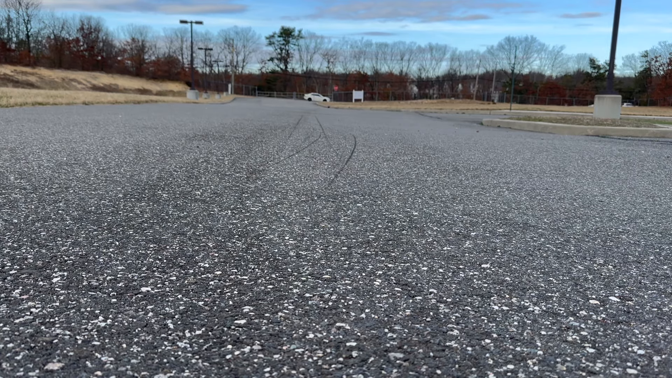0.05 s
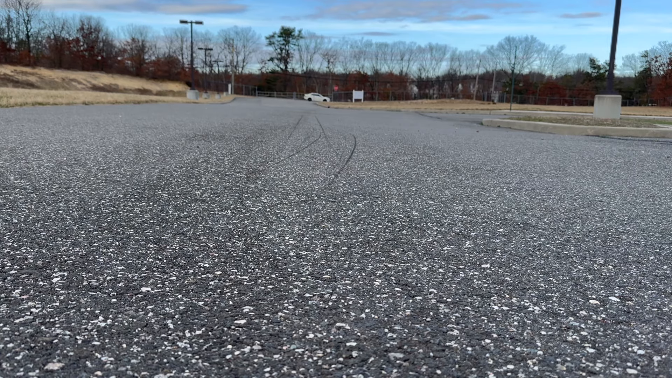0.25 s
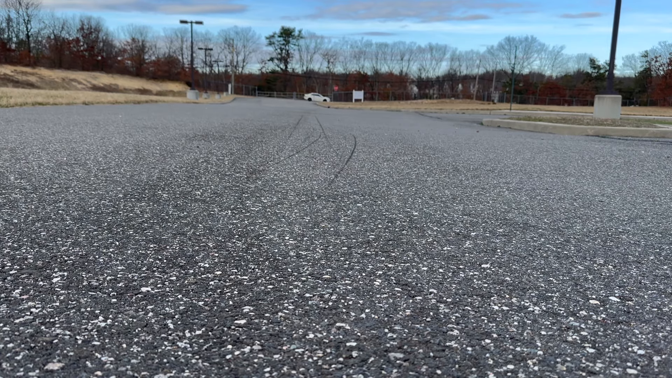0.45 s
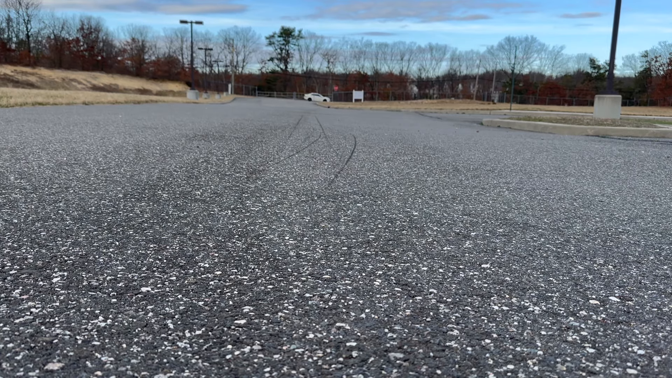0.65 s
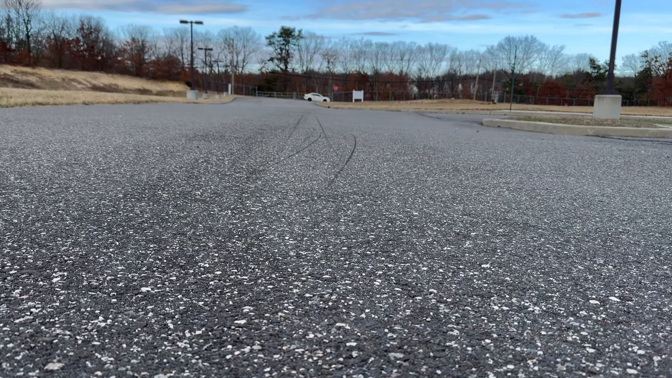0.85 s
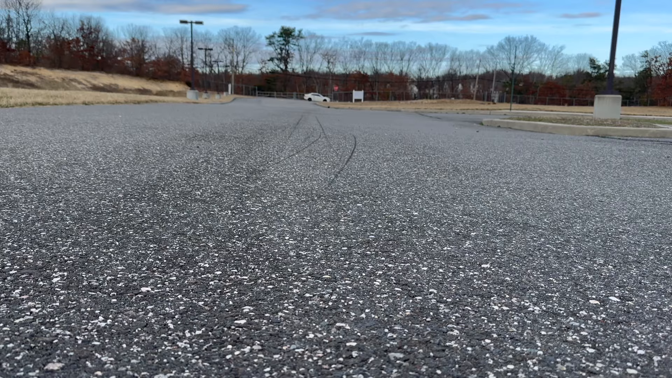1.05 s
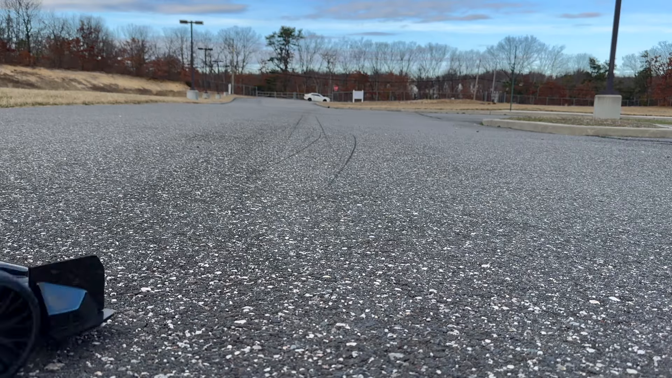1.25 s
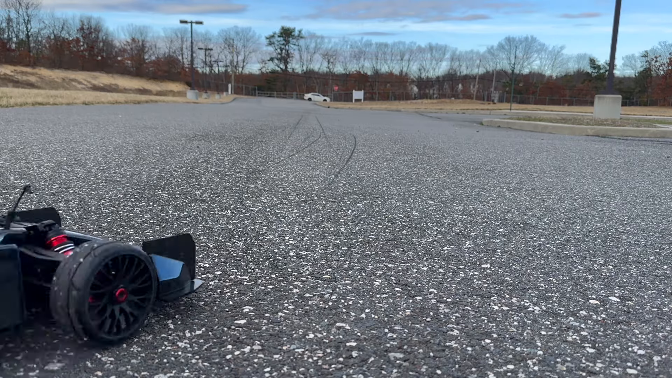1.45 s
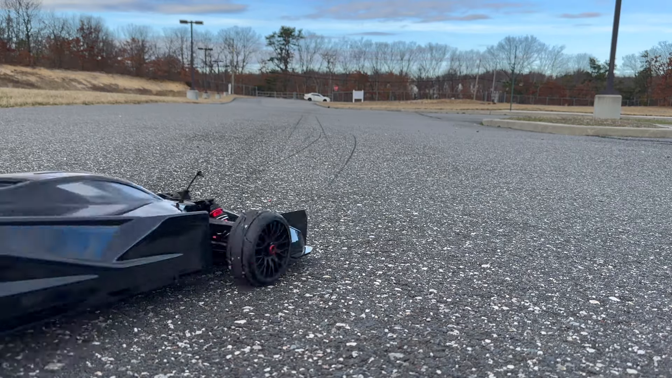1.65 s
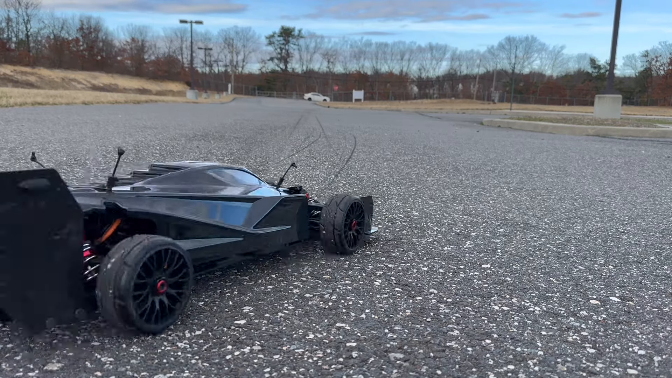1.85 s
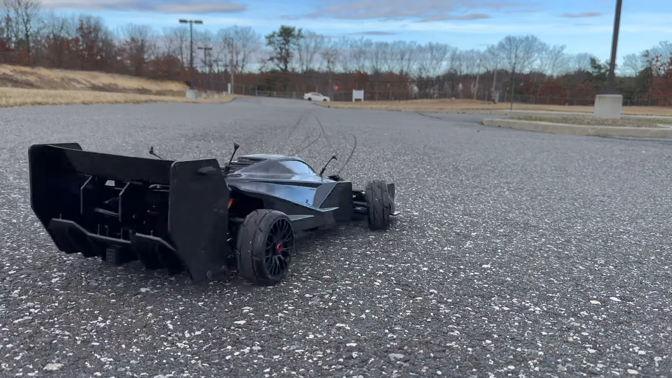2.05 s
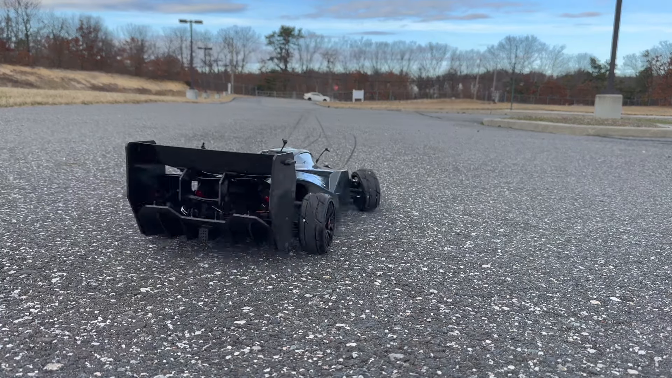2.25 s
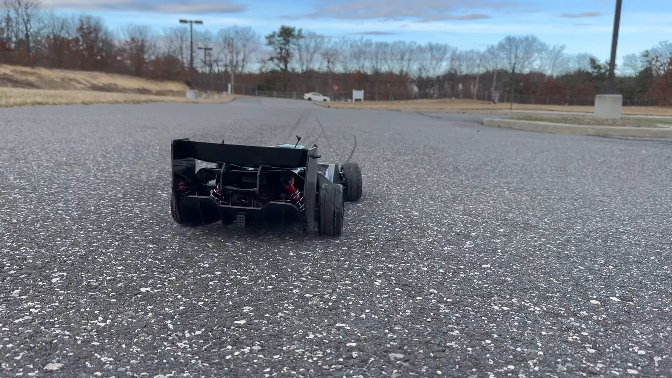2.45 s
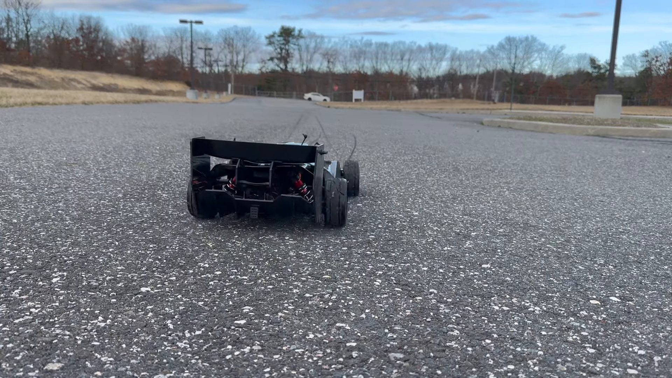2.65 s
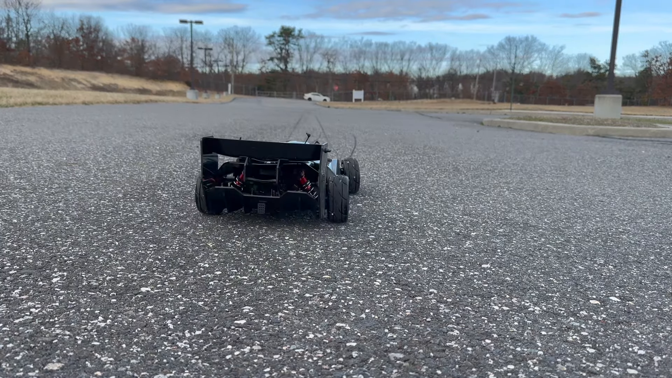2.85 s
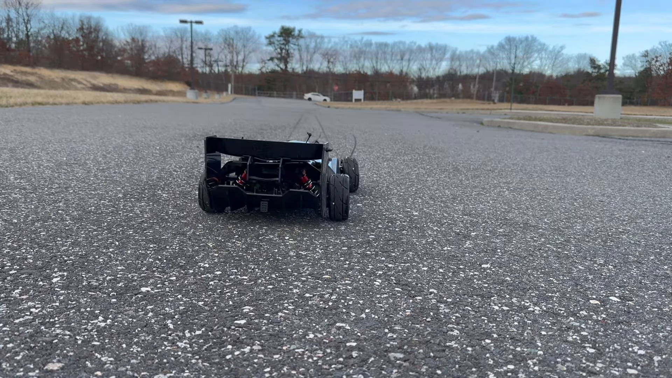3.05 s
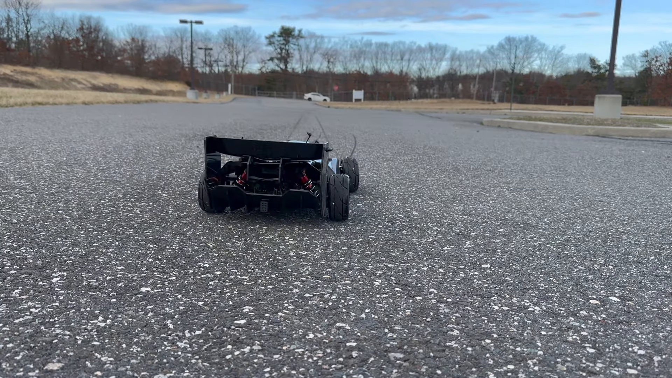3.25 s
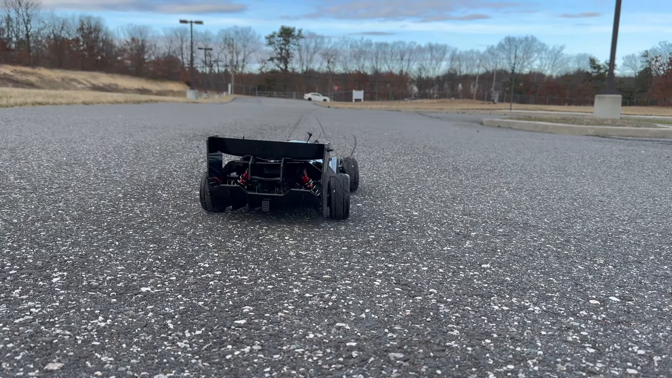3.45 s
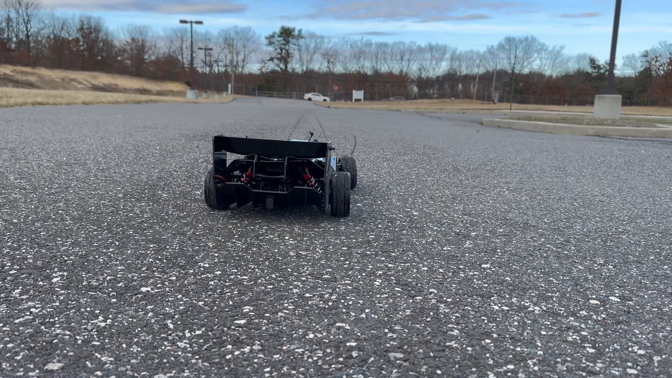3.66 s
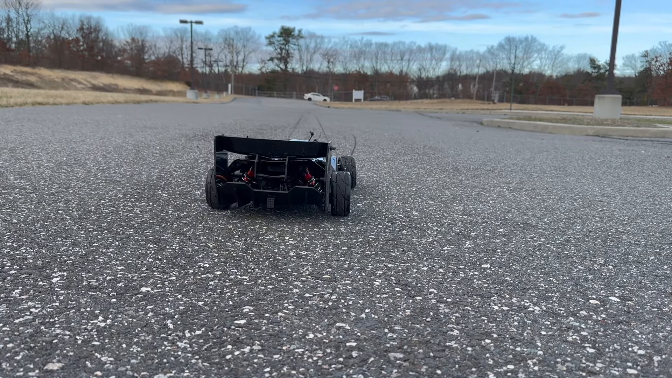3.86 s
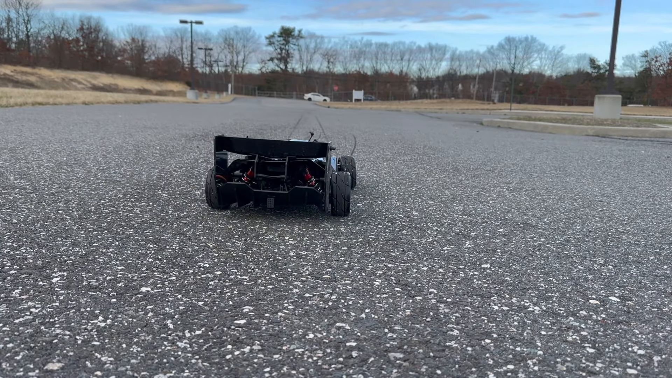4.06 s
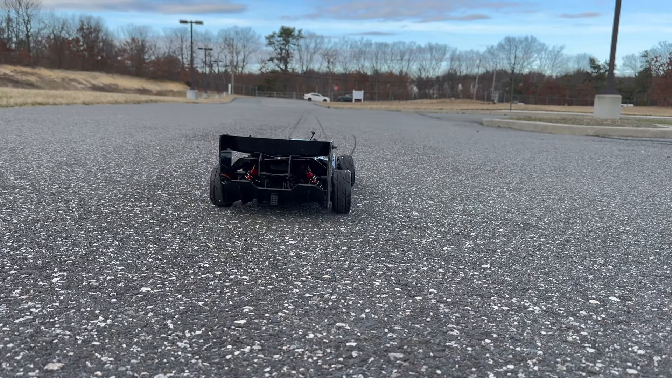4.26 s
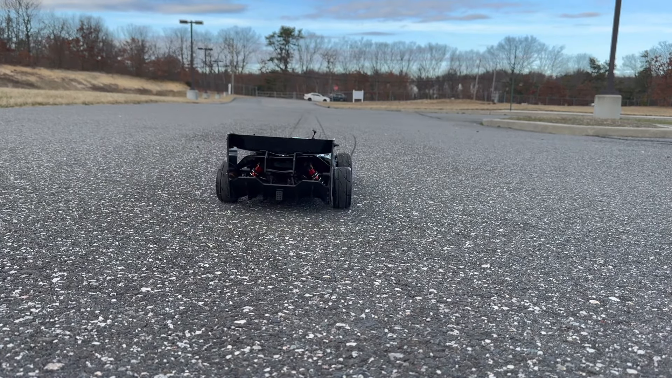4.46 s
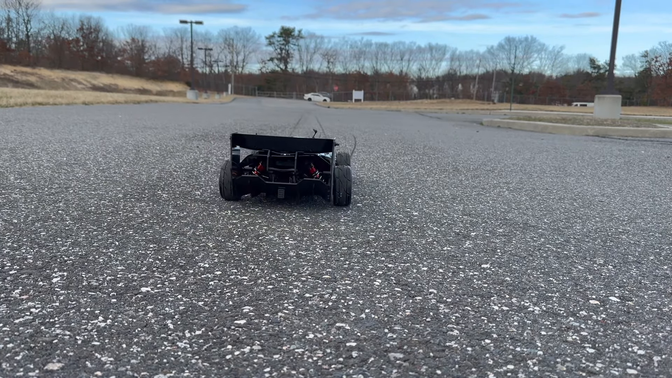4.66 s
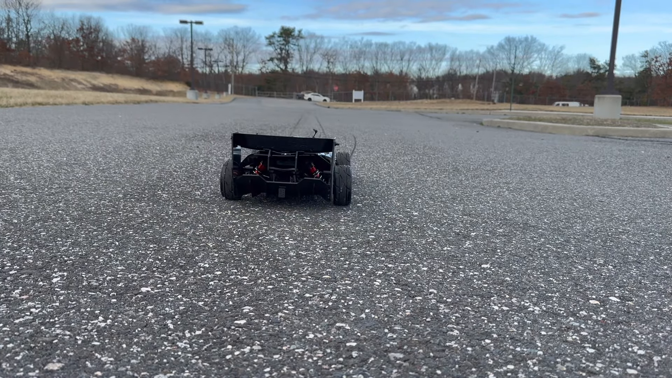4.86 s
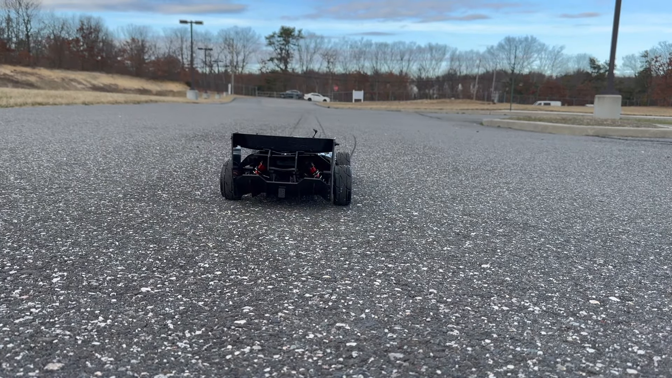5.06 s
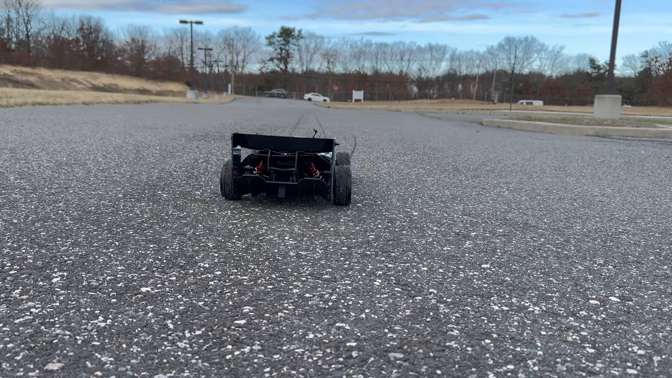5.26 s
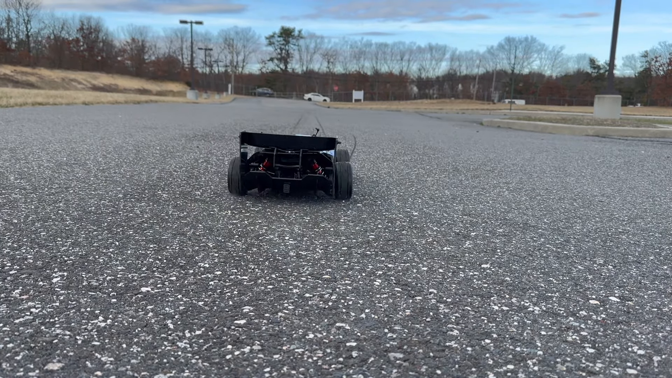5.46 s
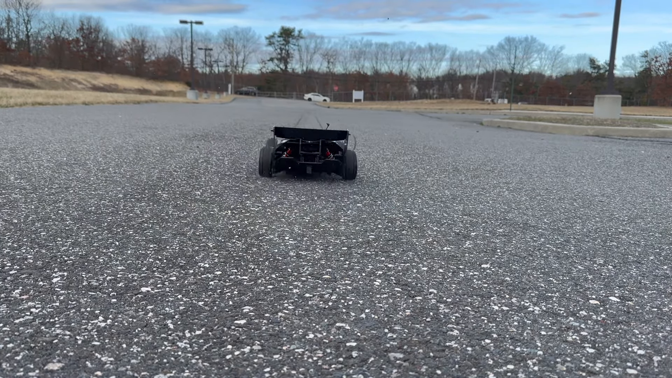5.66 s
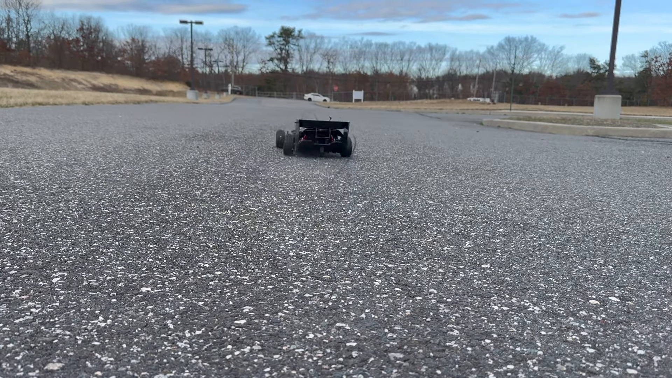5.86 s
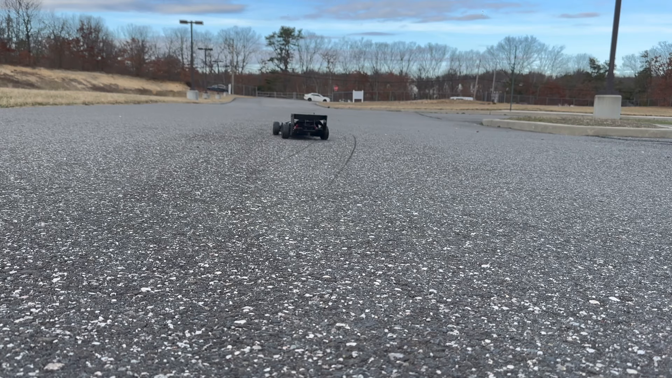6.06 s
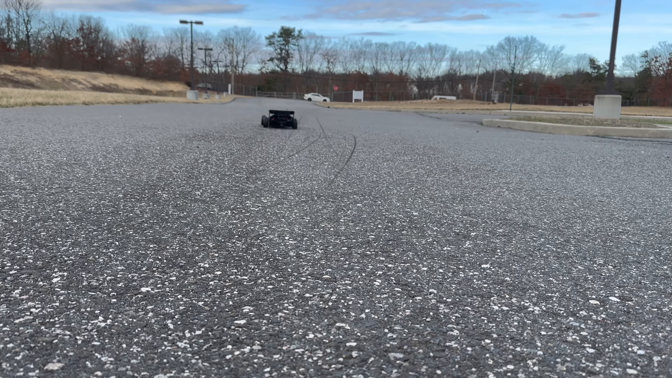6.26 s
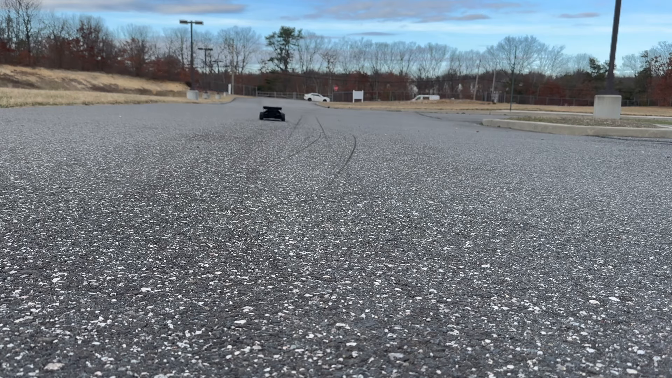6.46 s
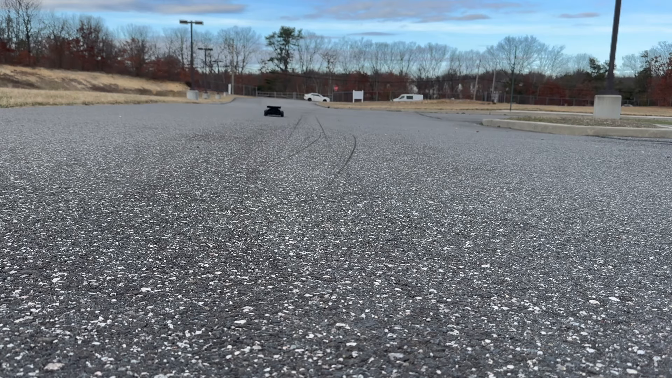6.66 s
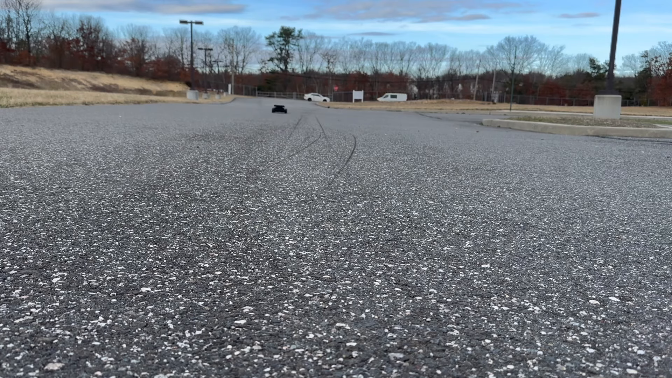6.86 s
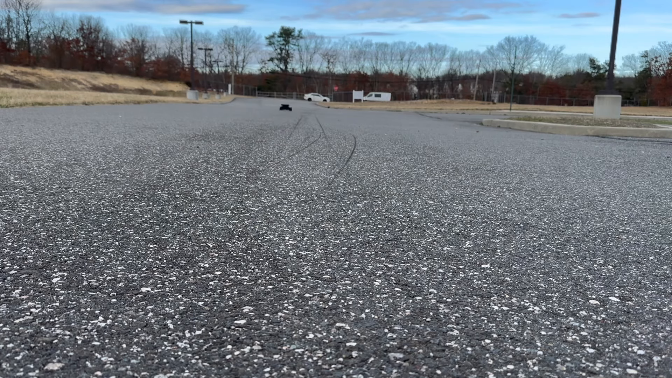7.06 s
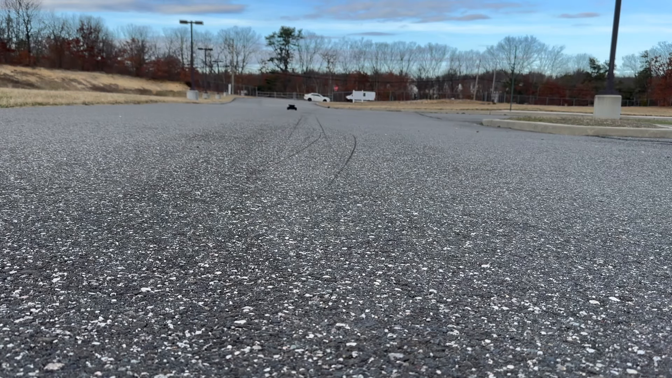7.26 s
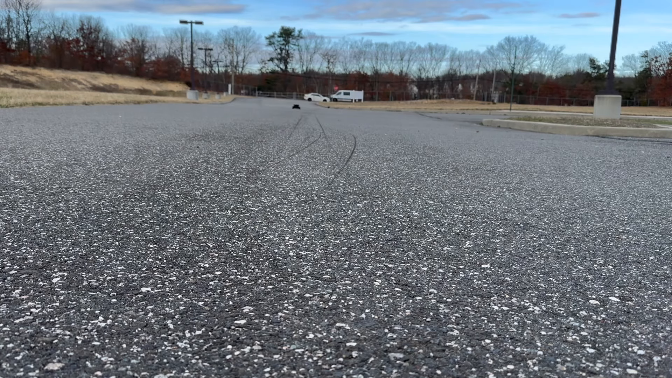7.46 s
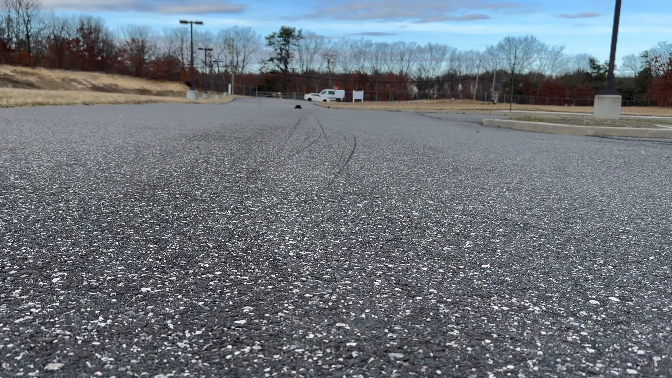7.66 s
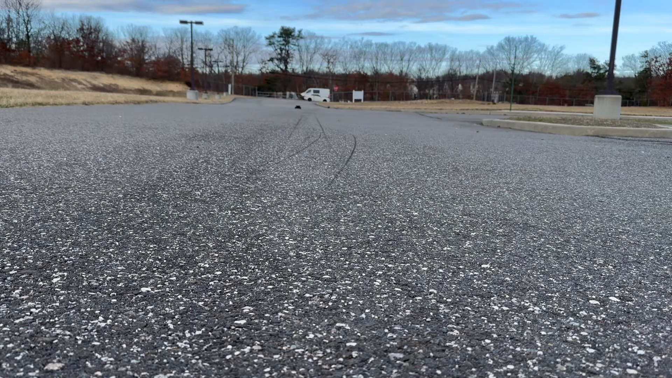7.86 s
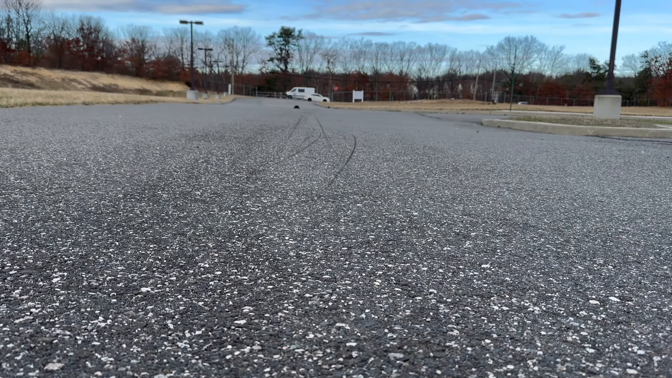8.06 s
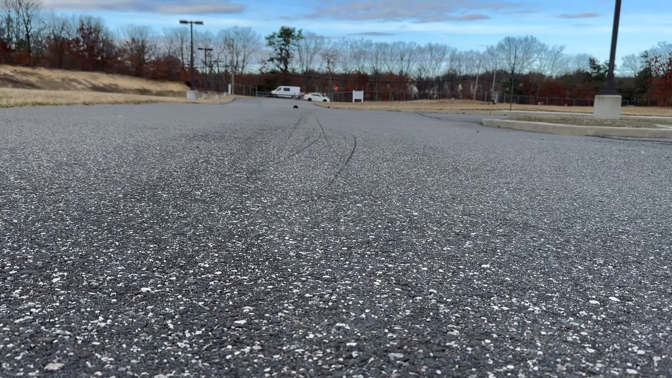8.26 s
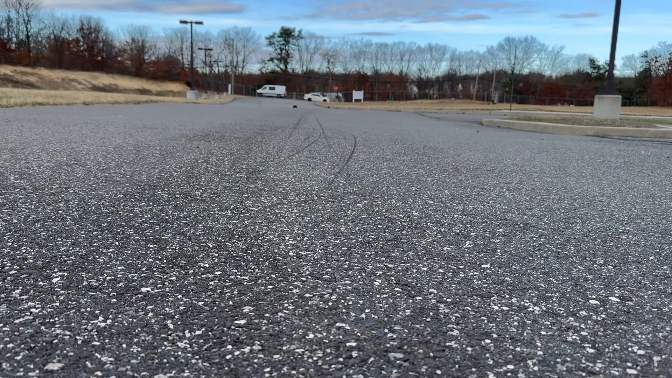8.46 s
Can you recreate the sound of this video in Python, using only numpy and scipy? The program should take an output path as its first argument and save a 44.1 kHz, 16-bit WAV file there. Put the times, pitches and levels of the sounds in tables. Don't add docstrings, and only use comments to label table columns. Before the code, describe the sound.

Wind buffets a close microphone as a toy-sized electric car clatters past, stops, chatters in short bursts, and whines away into the distance.

```python
import sys
import numpy as np
from scipy import signal
from scipy.fft import rfft, irfft, next_fast_len
from scipy.io import wavfile
from scipy.ndimage import uniform_filter1d

SR = 44100
rng = np.random.default_rng(int(sys.argv[2]) if len(sys.argv) > 2 else 0)


def field_ratio(decibels):
    return 10 ** (np.asarray(decibels, dtype=float) / 20)


def wav_record(signal):
    frames = np.transpose(np.atleast_2d(signal))
    bounded = np.clip(frames, -1, 1)
    quanta = np.round(bounded * 32767).astype(np.int16)
    wavfile.write(sys.argv[1], SR, quanta)


N = 375206
T = np.arange(N) / SR

# (time [s], rattle level [dB], left over right in the bass [dB])
ROLL = [
    (0.0, -41.5, -15.5),
    (0.64, -31.5, 2),
    (1.31, -34.5, 15.5),
    (1.5, -32.5, 4),
    (1.67, -34, 11),
    (2.38, -36, 0),
    (2.7, -43, 4.5),
    (3.04, -62, 0),
]
# (time [s], chatter level [dB])
RUN = [
    (5.46, -23.5),
    (5.74, -22),
    (6.03, -30),
    (6.1, -34),
    (6.57, -35),
    (6.95, -36.5),
    (7.1, -39.5),
    (7.15, -45.5),
    (7.6, -49),
    (8.51, -50),
]
# (resonance [Hz], width [Hz], level [dB])
LOADED_BODY = [(939, 83, 7.5), (1330, 74, 4.5), (1768, 55, 7), (2170, 120, 0), (3380, 370, -1),
               (4100, 310, 0), (7300, 1300, -19), (8240, 210, -21.5), (9170, 90, -36.5), (9630, 120, -21)]
# (frequency [Hz], level [dB])
LOADED_FILL = [(300, -52), (800, -3), (2500, -2), (5000, -15.5), (7000, -12.5), (10000, -9), (13000, -19),
               (16000, -16.5)]


def evened(x):
    return x / np.sqrt(np.mean(x ** 2) + 1e-20)


def read(points, hz):
    f, value = np.transpose(points)
    return np.interp(np.log(hz + 1), np.log(f + 1), value)


def curves(rows):
    s, *columns = np.transpose(rows)
    gate = uniform_filter1d(1. * (T > s[0]) * (T < s[-1]), size=260)
    return [gate] + [np.interp(T, s, c) for c in columns]


def band(x, lo_hz, hi_hz):
    return signal.sosfilt(signal.butter(3, [lo_hz, hi_hz], "bandpass", fs=SR, output="sos"), x)


def lowpassed(x, order, hz):
    return signal.sosfiltfilt(signal.butter(order, hz, fs=SR, output="sos"), x)


def wander(hz):
    sos = signal.butter(4, hz, fs=SR / 32, output="sos")
    coarse = signal.sosfilt(sos, rng.standard_normal(N // 32 + 2))
    return np.interp(np.arange(N) / 32, np.arange(len(coarse)), evened(coarse))


def field(colour, same):
    size = next_fast_len(N)
    hz = np.fft.rfftfreq(size, 1 / SR)
    left, other = rfft(rng.standard_normal((2, size)))
    same = np.clip(read(same, hz), -1, 1)
    pair = np.array([left, same * left + np.sqrt(1 - same ** 2) * other])
    return evened(irfft(pair * field_ratio(read(colour, hz)), size)[:, :N])


def traffic():
    # (frequency [Hz], level [dB])
    spectrum = [(180, -27.5), (300, -21.5), (600, -9), (647, -9), (1100, -8.5), (1240, -11), (1530, -10.5),
                (1650, -15.5), (4660, -37.5), (8800, -50), (10200, -65.5), (14300, -100.5), (22000, -120)]
    # (frequency [Hz], left-right likeness [-1 to 1])
    likeness = [(60, 0.88), (130, 0.42), (290, 0.97), (640, -0.038), (1410, -0.35), (3100, 0.62),
                (6820, -0.44), (15000, -0.5)]
    # (time [s], level [dB])
    swell = [
        (0, 5.5),
        (3, 3),
        (5.2, 2.5),
        (7, -3),
        (8.5, 2.5),
    ]
    swell_db = np.interp(T, *np.transpose(swell)) + 1.45 * wander(8.3)
    return field_ratio(swell_db - 48) * field(spectrum, likeness)


def wind():
    # (time [s], level [dB])
    strength = [(0.0, -43), (0.57, -31), (0.75, -36), (0.92, -23), (1.04, -39), (1.3, -30), (1.55, -42),
                (1.85, -31), (2.2, -39.5), (2.9, -33), (3.3, -33), (3.74, -46), (4.07, -43.5),
                (4.69, -36.5), (5.25, -46), (6.2, -45), (6.6, -55.5), (7.0, -48), (7.9, -47.5), (8.08, -46),
                (8.51, -46.5)]
    # (time [s], peak level [dB], frequency [Hz])
    gusts = [(0.354, -18, 145), (0.896, -23.5, 99.3), (1.204, -21.5, 193), (1.323, -19.5, 102),
             (1.464, -11.5, 507), (1.746, -18.5, 216), (1.945, -9.5, 282), (2.517, -43, 174),
             (2.574, -14, 147), (2.686, -9, 272), (2.959, -17.5, 190), (3.219, -14, 141),
             (4.04, -14.5, 212), (4.102, -16, 155.4), (4.489, -24, 119), (4.649, -16.5, 195),
             (3.27, -24, 303), (3.318, -25, 397), (6.207, -25, 200), (8.069, -24, 90), (0.208, -19, 93.5),
             (0.454, -15.5, 125), (1.096, -21, 85.6), (1.851, -19, 68.3), (2.245, -30, 84),
             (2.368, -18.5, 200), (3.128, -35.5, 108.4), (3.239, -30, 444), (3.295, -24, 347),
             (3.53, -22.5, 189), (3.831, -26.5, 87), (3.994, -18.5, 89), (4.921, -24, 165),
             (6.785, -37, 123.5), (7.788, -32.5, 81), (7.904, -41, 129)]
    # (frequency [Hz], level [dB])
    rumble = [(20, -56), (40, 4.5), (75, 12), (130, 8.5), (200, 0), (300, -68)]
    # (frequency [Hz], level [dB])
    flutter = [(120, -23), (200, 1), (300, -4), (450, -10), (700, -57)]
    _, wind_db = curves(strength)
    same = [(1, 0.67), (2, 0.67)]
    out = field(rumble, same) * field_ratio(wind_db + 3.33 * wander(30) + 0.5)
    out += field(flutter, same) * field_ratio(wind_db - 8 + 5.3 * wander(52))
    t = np.arange(-700, 700) / SR
    for (s, peak_db, hz), phase in zip(gusts, rng.uniform(0, 2 * np.pi, len(gusts))):
        swing = np.cos(2 * np.pi * hz * t + phase)
        flip = field_ratio(peak_db - 2.5) * swing * np.exp(-(t * hz / 0.45) ** 2)
        out[:, round(s * SR) - 400:][:, :1400] += flip
    return out


def grit():
    # (time [s], peak level [dB])
    stones = [
        (1.869, -17),
        (5.913, -20),
        (6.038, -7),
    ]
    out, t = np.zeros(N), np.arange(200) / SR
    for (s, peak_db), noise in zip(stones, rng.standard_normal((len(stones), 200))):
        out[round(s * SR):][:200] += field_ratio(peak_db + 3.0) * noise * np.exp(-((t - .0008) / 0.00019) ** 2)
    return band(out, 4000, 10500)


def body(modes, fill):
    hz = abs(np.fft.fftfreq(8192, 1 / SR))
    power = field_ratio(read(fill, hz)) ** 2
    power += sum(field_ratio(db) ** 2 / (1 + (2 * (hz - f) / w) ** 2) ** 1.027 for f, w, db in modes)
    log_gain = np.log(power) / 2
    decay = np.fft.ifft(np.exp(log_gain - 1j * signal.hilbert(log_gain).imag)).real[:4096]
    parts = []
    for kind in ("low", "high"):
        half = signal.butter(2, 3500, kind, fs=SR, output="sos")
        part = signal.sosfilt(np.vstack([half, half]), decay)
        parts.append(part / np.linalg.norm(part))
    return parts


def ring(low_drive, high_drive, response):
    low = signal.oaconvolve(low_drive, response[0])[:N]
    return low + signal.oaconvolve(high_drive, response[1])[:N]


def knocks(per_s, spread_db, lump_hz, lump_db):
    size = field_ratio(spread_db * np.minimum(rng.exponential(1, N), 4)) * rng.choice([-1, 1], N)
    return evened(size * (rng.random(N) < per_s / SR) * field_ratio(lump_db * wander(lump_hz)))


def clack_drives(clacks, bright_db, decay_s, dull):
    low, high = np.zeros((2, N))
    t = np.arange(600) / SR
    bounces = rng.standard_normal((len(clacks), 600)) * np.exp(-t / .0045) * (1 - np.exp(-t / .0003))
    bounces /= np.linalg.norm(bounces, axis=1)[:, None]
    for (s, peak_db), bounce in zip(clacks, bounces):
        start = round(s * SR)
        treble = signal.lfilter([1], [1, -min(dull, .9)], bounce * np.exp(-t / decay_s))
        low[start:][:600] += field_ratio(peak_db + 15.5) * bounce
        high[start:][:600] += field_ratio(peak_db + bright_db) * treble
    return np.array([low, high])


def coasting():
    # (resonance [Hz], width [Hz], level [dB])
    side_body = [(878, 110, 2), (1530, 90, 10), (2320, 450, -7), (3830, 430, -16), (5870, 240, -14.5),
                 (8400, 190, -23.5), (9620, 150, -14), (9900, 75, -26.5)]
    quarter_body = [(894, 170, -1.5), (1350, 79, -1.5), (1758, 120, 2.5), (3210, 560, -6.5),
                    (3890, 320, -2.5), (4400, 180, -2), (5560, 160, -1), (9550, 36, -0.5), (9800, 74, 5)]
    rear_body = [(1023, 66, 10), (1350, 140, 5.5), (1735, 102, 14), (2090, 110, -27), (3485, 320, -3),
                 (4170, 310, -3.5), (5630, 210, -19), (8230, 180, -44), (9400, 22, 3), (10480, 46, -4)]
    # (frequency [Hz], level [dB])
    coast_fill = [(400, -15), (900, -4.5), (2500, -17.5), (4500, -24.5), (7000, -21.5), (10000, -56),
                  (13000, -39), (16000, -55.5)]
    turn_s = [1.36, 1.6]
    treble_turn_s = [0.86, 2.66]
    square_s = [1.95, 2.25]
    # (time [s], peak level [dB])
    bumps = [(0.0354, -22), (0.1506, -32), (0.2838, -27.5), (0.3855, -31), (0.4279, -32), (0.4623, -29.5),
             (0.5297, -25), (0.5985, -31), (0.624, -30), (0.688, -15.5), (0.7991, -45), (0.8185, -23.5),
             (0.9058, -31), (0.9338, -52), (0.9884, -23.5), (1.0146, -19), (1.116, -17.5), (1.1493, -15),
             (1.7076, -32), (1.739, -28.5), (1.7719, -37), (1.8193, -29), (1.8777, -32), (2.0558, -28.5),
             (2.1057, -30), (1.8996, -26), (1.9226, -24.5), (1.966, -25.5), (1.9959, -36), (2.181, -28),
             (2.203, -17), (2.238, -23), (2.2752, -24), (2.3002, -24.5), (2.3242, -19.5), (2.3551, -31),
             (2.4006, -29), (2.4239, -18.5), (2.4585, -23)]
    # (time [s], peak level [dB])
    snaps = [
        (1.297, -45.5),
        (1.321, -22.5),
        (1.3294, -17),
        (1.346, -10),
        (1.3833, -13.5),
        (1.396, -16.5),
        (1.508, -16),
        (1.524, -27.5),
        (1.5816, -16),
    ]
    # (time [s], peak level [dB])
    stop_clacks = [(2.3778, -28.5), (2.4332, -24.5), (2.4771, -21.5), (2.493, -35), (2.511, -32),
                   (2.5215, -31), (2.579, -28), (2.617, -20), (2.638, -17.5), (2.6482, -25.5), (2.685, -24),
                   (2.755, -23.5), (2.543, -23.5), (2.5637, -18), (2.5965, -30), (2.6265, -18.5),
                   (2.6715, -23.5), (2.6967, -21.5), (2.7083, -19.5), (2.7383, -21.5), (2.7717, -23.5),
                   (2.7832, -25.5), (2.8041, -19.5), (2.8232, -18.5), (2.8421, -21.5), (2.861, -17),
                   (2.8838, -19.5), (2.8992, -28.5), (2.9334, -21), (2.9498, -17.5), (2.9755, -24.5),
                   (3.01, -26), (3.0284, -23.5),
                   (3.5019, -16), (3.5257, -29.5), (3.558, -31), (3.5775, -31.5), (3.6343, -20),
                   (3.661, -25.5), (3.705, -23.5), (3.7522, -28), (4.332, -22.5), (4.3854, -24),
                   (4.3952, -27.5), (4.413, -27), (4.4383, -22), (4.4628, -24), (4.4785, -28),
                   (4.5034, -23), (4.5224, -23.5), (4.5447, -24), (4.567, -23), (4.5891, -23),
                   (4.6053, -25), (4.6405, -26), (4.667, -25.5), (4.7069, -21.5), (4.7488, -25.5),
                   (4.817, -25.5), (4.857, -28)]
    gate, rattle_db, _ = curves(ROLL)
    level_s, far_db, dulling_db_per_s = 1.576, -9, 15.5
    treble_db = np.where(T < level_s, far_db, -dulling_db_per_s * (T - level_s))
    rattle = gate * knocks(per_s=3000., spread_db=2.5, lump_hz=61.0, lump_db=2.5)
    drives = np.array([rattle * field_ratio(rattle_db - 2.5), rattle * field_ratio(rattle_db + treble_db - 7.0)])
    drives += clack_drives(bumps, bright_db=5.1, decay_s=.0053, dull=.06)
    drives += clack_drives(snaps, bright_db=11.7, decay_s=.015, dull=.022)
    drives += clack_drives(stop_clacks, bright_db=4.3, decay_s=.0048, dull=.57)
    low, high = drives
    turn, late_turn, square = (np.interp(T, span, [0, np.pi / 2])
                               for span in (turn_s, treble_turn_s, square_s))
    side = ring(low * np.cos(turn), high * np.cos(late_turn), body(side_body, coast_fill))
    low, high = low * np.sin(turn), high * np.sin(late_turn)
    quarter = ring(low * np.cos(square), high * np.cos(square), body(quarter_body, coast_fill))
    rear = ring(low * np.sin(square), high * np.sin(square), body(rear_body, coast_fill))
    return side + quarter + rear


def glints(x):
    patch_hz, patch_s, depth_db = 600, .07, 2.2
    end = round(ROLL[-1][0] * SR)
    hz, t, z = signal.stft(x[:end + 8192], SR, nperseg=512, noverlap=384)
    patches = rng.standard_normal(z.shape)
    for _ in range(2):
        patches = uniform_filter1d(patches, round(patch_hz / hz[1]), 0)
        patches = uniform_filter1d(patches, round(patch_s / t[1]), 1)
    depth = np.clip(hz / 3000, 0, 1)[:, None] * (t < 2.54)
    part = signal.istft(z * field_ratio(depth_db * depth * evened(patches)), SR, nperseg=512, noverlap=384)[1]
    return np.concatenate([part[:end], x[end:]])


def tone(rows, shake, shake_hz, flutter_db, under_db, third_db, shaft, under=1 / 2, twin_db=-60, blur=0):
    gate, hz, first_db, second_db = curves(rows)
    angle = 2 * np.pi * np.cumsum(hz * (1 + shake * wander(shake_hz))) / SR
    partials = [(under, first_db + under_db), (2 * under, first_db + twin_db), (1, first_db),
                (2, second_db), (3, second_db + third_db), (4, second_db + 1.3 * third_db)]
    on, lines = gate > 0, np.zeros(N)
    for k, db in partials:
        level = field_ratio((db + flutter_db * wander(shake_hz))[on])
        lines[on] += level * np.sin(k * angle[on] + blur * (k - 1) * wander(400)[on])
    return gate * np.sqrt(2) * lines * (1 + 0.14 * np.sin(shaft * angle))


def judder():
    # (time [s], frequency [Hz], first partial [dB], second partial [dB])
    pitch = [(1.385, 462, -35.5, -26), (1.422, 460, -33, -44), (1.445, 432.3, -25, -20),
             (1.466, 420, -37, -24), (1.484, 418.4, -21.5, -31), (1.508, 405.5, -21.5, -15.5),
             (1.526, 433, -25.5, -38), (1.54, 406, -26, -21), (1.565, 430, -43, -53)]
    return tone(pitch, shake=.065, shake_hz=150, flutter_db=3, under_db=-26, third_db=-13, shaft=.08)


def switching():
    # (time [s], frequency [Hz], first partial [dB], second partial [dB])
    pitch = [
        (1.405, 7978, -50, -86),
        (1.47, 7880, -40, -85),
        (1.53, 8140, -57.5, -89),
    ]
    return tone(pitch, shake=.0003, shake_hz=60, flutter_db=2, under_db=-50, third_db=0, shaft=0)


def powered(tables, chatter, response):
    scrub = evened(band(knocks(per_s=940.0, spread_db=3.5, lump_hz=54.5, lump_db=-5.0), 244, 1100))
    low, high, tyres = np.zeros((3, N))
    for rows in tables:
        gate, chatter_db, treble_db, scrub_db = curves(rows)
        low += gate * field_ratio(chatter_db - 1.5)
        high += gate * field_ratio(chatter_db + treble_db + 4.0)
        tyres += gate * field_ratio(chatter_db + scrub_db - 6.5)
    return ring(low * chatter, high * chatter, response) + tyres * scrub


def bursts():
    # (throttle on [s], off [s], chatter level [dB], start below it [dB], treble over it [dB])
    throttle = [
        (1.381, 1.516, -25.5, -5.5, -19.5),
        (3.368, 3.467, -16.5, 2, -18.5),
        (4.101, 4.287, -18, 9.5, -19.5),
        (5.33, 5.455, -13, 5, -16),
    ]
    build_s, release_s, release_db = 0.047, 0.084, -33.5
    scrub_start_db, scrub_db = -16.5, -6.5
    return [[(on, db - short_db, treble_db, scrub_start_db),
             (min(on + build_s, off - .005), db, treble_db, scrub_db),
             (off, db, treble_db, scrub_db),
             (off + release_s, db + release_db, treble_db, scrub_db)]
            for on, off, db, short_db, treble_db in throttle]


def scrape():
    # (resonance [Hz], width [Hz], level [dB])
    scrape_body = [(830, 70, 1), (1570, 120, -4.5), (2300, 250, 8), (2830, 250, -8), (3390, 300, -6),
                   (4030, 300, -11.5), (4820, 300, -14.5), (5650, 480, -7)]
    chatter = knocks(per_s=3600.0, spread_db=2.5, lump_hz=90, lump_db=2.5)
    return powered(bursts()[:1], chatter, body(scrape_body, LOADED_FILL))


def throttle_chatter():
    chatter = knocks(per_s=3500., spread_db=2.5, lump_hz=110, lump_db=3)
    return powered(bursts()[1:], chatter, body(LOADED_BODY, LOADED_FILL))


def slams():
    # (time [s], peak level [dB])
    take_ups = [(3.3602, -19), (3.370, -10.5), (3.382, -10.5), (3.388, -10.5), (3.397, -9.5), (3.408, -3.5),
                (3.419, -6.5), (3.430, -7), (3.438, 0), (3.456, -7), (3.476, -9.5),
                (4.092, -18), (4.11, -10), (4.127, -8), (4.14, -16), (4.154, -3), (4.167, -12.5),
                       (4.18, -7), (4.203, -1.5), (4.22, -6.5), (4.235, -6.5), (4.25, -14.5), (4.265, -6),
                       (4.283, -14),
                (5.3108, -12.5), (5.324, -19.5), (5.338, 3), (5.351, -3), (5.373, -3),
                       (5.385, -10.5), (5.395, -6.5), (5.407, -7.5), (5.424, -10.5), (5.437, -6.5),
                       (5.448, -10), (5.459, -13.5)]
    # (time [s], peak level [dB])
    far_bumps = [(7.1452, -38.5), (7.1811, -39), (7.252, -45.5), (7.3657, -49), (7.3827, -38),
                 (7.4161, -37.5), (7.5124, -46.5), (7.5453, -40)]
    blows = take_ups + far_bumps
    low, high = clack_drives(blows, bright_db=9.3, decay_s=.003, dull=.1)
    return field_ratio(-2.5) * ring(low, high, body(LOADED_BODY, LOADED_FILL))


def wheelspin():
    # (time [s], mesh frequency [Hz], first partial [dB], second partial [dB])
    pitch = [
        (5.459, 1600, -36, -30),
        (5.52, 2070, -29, -25),
        (5.575, 2215, -22.5, -27),
        (5.645, 2290, -26, -26),
        (5.69, 2535, -21, -26),
        (5.815, 2525, -22, -25),
        (5.865, 2130, -32, -24),
        (5.978, 1751, -35, -27),
        (6.03, 1400, -39, -31),
        (6.15, 1200, -44, -60),
    ]
    return tone(pitch, shake=.004, shake_hz=130, flutter_db=3, under_db=-9, third_db=-19, shaft=.045,
                under=.69, blur=.75)


def lay_gear():
    # (time [s], mesh frequency [Hz], first partial [dB], second partial [dB])
    pitch = [(5.5, 915, -36.5, -49.5), (5.545, 968, -26, -29), (5.61, 1010, -30, -39),
             (5.7, 1085, -31, -20), (5.8, 1140, -32.5, -41), (5.83, 970, -34, -41), (5.95, 950, -41, -35),
             (6.02, 950, -66.5, -46.5)]
    return tone(pitch, shake=.02, shake_hz=120, flutter_db=3, under_db=-40, third_db=-10, shaft=.1)


def axle():
    # (time [s], frequency [Hz])
    pitch = [
        (6.029, 990),
        (6.201, 1025),
        (6.32, 1077),
        (7.12, 1054),
    ]
    s, hz = np.transpose(pitch)
    db = np.interp(s, *np.transpose(RUN))
    rows = np.transpose([s, hz, db - 5 - 20 * (s - s[0]), db - 10])
    return tone(rows, shake=.015, shake_hz=60, flutter_db=3, under_db=-30, third_db=-8, shaft=.1)


def gripping():
    # (time [s], mesh frequency [Hz])
    grip = [(6.04, 983), (6.2, 1055), (6.33, 1205), (6.45, 1450), (6.58, 1611), (6.65, 2160), (6.77, 2170),
            (6.87, 2764), (7.04, 2900), (7.11, 3140), (7.14, 2320)]
    # (time [s], rise [Hz], half length [s])
    slips = [
        (6.383, 368.7, .06),
        (6.51, 341.2, 0.066),
        (6.819, 888, .05),
        (6.908, 475.5, .045),
        (6.979, 973, 0.074),
        (7.08, 193, 0.0233),
    ]
    # (time [s], its first partial [dB], its second partial [dB]), both over the mesh
    second_gear = [
        (6.04, -22, -14),
        (6.42, -22, -10),
        (6.47, -20, 3),
        (6.61, -12, 4),
        (6.65, -3, -14),
        (6.8, -4, -14),
        (7.14, -4, -14),
    ]
    housing_hz, air_hz = 3400, 4500
    s = np.arange(grip[0][0], grip[-1][0], 1 / 500)
    road_hz = np.interp(s, *np.transpose(grip))
    chatter_db = np.interp(s, *np.transpose(RUN))
    hz = road_hz.copy()
    for at, rise_hz, half_s in slips:
        hz += rise_hz * np.cos(np.pi / 2 * np.clip((s - at) / half_s, -1, 1)) ** 2
    first_db = chatter_db - 5 + 14 * np.log2(hz / road_hz) - 2.5 * abs(np.log2(hz / housing_hz))
    second_db = chatter_db - 2.5 - 6 * abs(np.log2(2 * hz / housing_hz))
    second_db -= 15 * np.maximum(np.log2(2 * hz / air_hz), 0)
    _, under_db, twin_db = curves(second_gear)
    return tone(np.transpose([s, hz, first_db, second_db]), shake=.015, shake_hz=110, flutter_db=3.5,
                under_db=under_db, third_db=-16, shaft=.07, under=.455, twin_db=twin_db, blur=.4)


def getaway():
    # (resonance [Hz], width [Hz], level [dB])
    run_body = [(928, 123, 2.5), (1281, 63, 7), (1678, 160, 4), (2183, 320, 2), (3284, 320, 1.5),
                (4060, 60, -30), (6430, 1100, -13), (8000, 240, -15.5), (8140, 750, -10), (9520, 360, -11)]
    # (frequency [Hz], level [dB])
    run_fill = [(300, -25.5), (800, -32.5), (2500, -4.5), (4500, -6.5), (7000, -23), (10000, -37),
                (13000, -27.5), (16000, -28.5)]
    treble_db, treble_loss, scrub_db = -2, 0.77, -11
    rows = [(s, db, treble_db + treble_loss * (db - RUN[0][1]), scrub_db) for s, db in RUN]
    chatter = knocks(per_s=9000., spread_db=1.5, lump_hz=90, lump_db=1.43)
    return powered([rows], chatter, body(run_body, run_fill))


def ports(x, echo_db):
    # (frequency [Hz], phase [rad])
    port_phase = [(0, 0), (1400, .05), (2070, .2), (2750, 1.1), (4100, 1.1), (6200, 1.5), (6800, 2.2),
                  (7150, 3.1), (7500, 3.6), (8150, 6.28), (8900, 5.8), (9500, 4.5), (11500, 4.5),
                  (13000, 7), (13700, 6.28), (22050, 6.28)]
    # (frequency [Hz], level [dB])
    car_balance = [(500, 0), (1400, -2), (2800, -0.5), (5600, 2), (10000, -0.5), (14000, -3)]
    # (frequency [Hz], level [dB])
    scatter_colour = [(400, -2), (1400, -5), (2700, 0), (4100, 0), (5500, 4), (7000, 4), (8000, -8),
                      (9000, -3), (13000, 2)]
    # (time [s], delay [samples])
    right_late = [
        (0, 19.5),
        (1.3, 18),
        (1.45, 12),
        (1.68, 4),
        (1.9, -0.5),
    ]
    shadow_hz, shadow_db_per_sample = 1110, 0.06
    size = next_fast_len(N + 4096)
    hz = np.fft.rfftfreq(size, 1 / SR)
    half = np.exp(.5j * np.interp(hz, *np.transpose(port_phase)))
    half *= field_ratio(read(car_balance, hz) / 2)
    spectrum = rfft(x, size)
    pair = irfft(spectrum * np.array([half, 1 / half]), size)[:, :N]

    scatter = rng.standard_normal((4, 2500)) * np.exp(-np.arange(2500) / 350)
    scatter = signal.lfilter([1, -.8], [1], scatter)
    scatter = rfft(scatter / np.linalg.norm(scatter[0]), size) * field_ratio(read(scatter_colour, hz))
    echoes = irfft(spectrum * scatter, size)[:, :N]
    drift = 2 * np.pi * 7 * T + 1.5 * wander(12)
    pair += field_ratio(echo_db) * (echoes[:2] * np.cos(drift) + echoes[2:] * np.sin(drift))

    low = lowpassed(pair[1], 4, 3000)
    deep = lowpassed(low, 4, shadow_hz)
    late = np.interp(T, *np.transpose(right_late))
    short = late * abs(late) / right_late[0][1]
    pair[1] += np.interp(T - late / SR, T, deep) + np.interp(T - short / SR, T, low - deep) - low
    pan_db = curves(ROLL)[-1] * (T < ROLL[-1][0])
    shade_db = shadow_db_per_sample * short
    bass = lowpassed(pair, 2, shadow_hz)
    panned = bass * field_ratio([pan_db / 2, -pan_db / 2])
    return panned + (pair - bass) * field_ratio([shade_db / 2, -shade_db / 2])


def scene():
    car = glints(coasting()) + scrape() + slams() + throttle_chatter() + getaway()
    car += wheelspin() + lay_gear() + switching() + gripping() + axle() + judder() + grit()
    car_db = 10 * np.log10(abs(uniform_filter1d(car ** 2, size=4000)) + 1e-12)
    duck = field_ratio(-0.3 * np.maximum(car_db + 19.5, 0))
    return ports(car, echo_db=0.0) + duck * wind() + traffic()


def gated(part, open_db):
    part_db = 10 * np.log10(abs(uniform_filter1d((part ** 2).mean(0), size=900)) + 1e-14)
    return part * np.clip((part_db - open_db) / 5, 0, 1)


def top_cut(x):
    return signal.sosfilt(signal.butter(12, 16990, fs=SR, output="sos"), x)


def record(dry):
    # (frequency [Hz], level [dB])
    band_levels = [(20, -24), (48, 0), (10450, 0), (10750, -65), (12200, -65), (12500, 0), (15800, 0),
                   (16000, -40), (17000, -90)]
    mono_hz = 13600
    size = next_fast_len(N + 4096)
    hz = np.fft.rfftfreq(size, 1 / SR)
    spectrum = rfft(.95 * np.tanh(dry / .95), size) * field_ratio(read(band_levels, hz))
    spectrum = np.where(hz > mono_hz, spectrum.mean(0), spectrum)
    rise = np.sin(np.pi / 2 * np.clip((hz - 9700) / 600, 0, 1)) ** 2
    parts = [1 - rise, rise * (hz < 11500), (hz >= 11500) * (hz < mono_hz),
             (hz >= mono_hz) * (hz < 15000), hz >= 15000]
    below, edge, *tops = (irfft(spectrum * part, size)[:, :N] for part in parts)
    top = sum(gated(part, open_db) for part, open_db in zip(tops, (-75, -78, -77)))
    mix = below + gated(edge, open_db=-73) + top
    return top_cut(mix)


dry = scene()
out = record(dry)
wav_record(out)
```